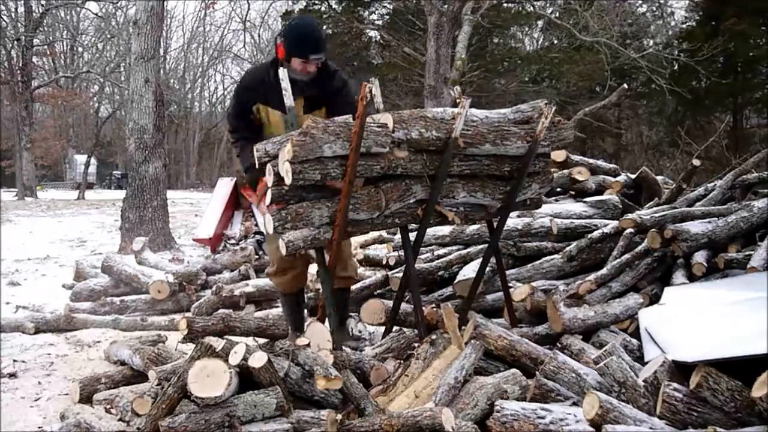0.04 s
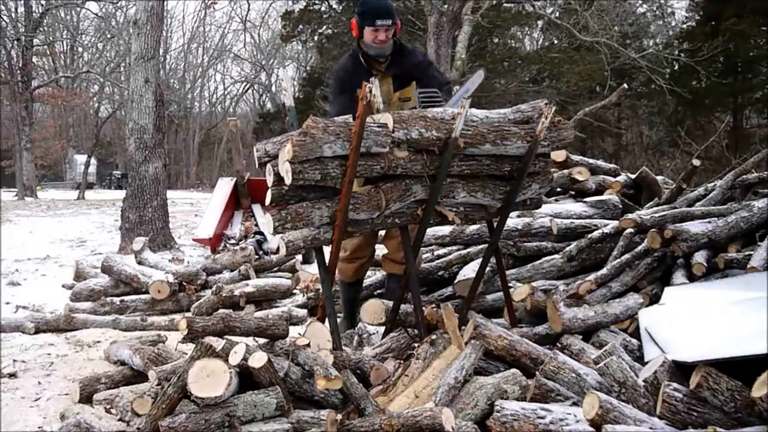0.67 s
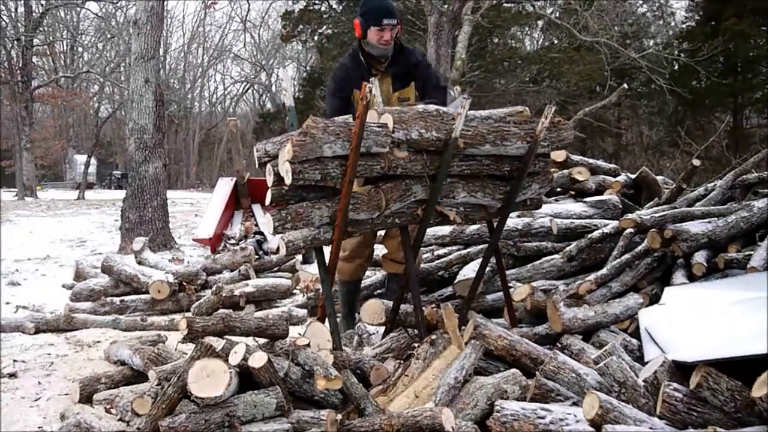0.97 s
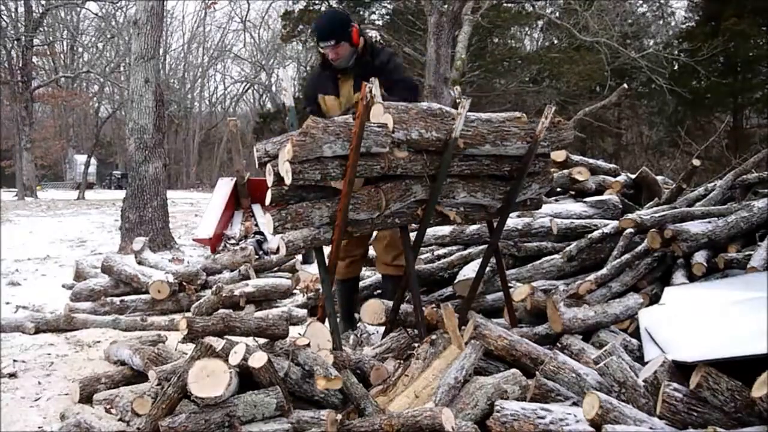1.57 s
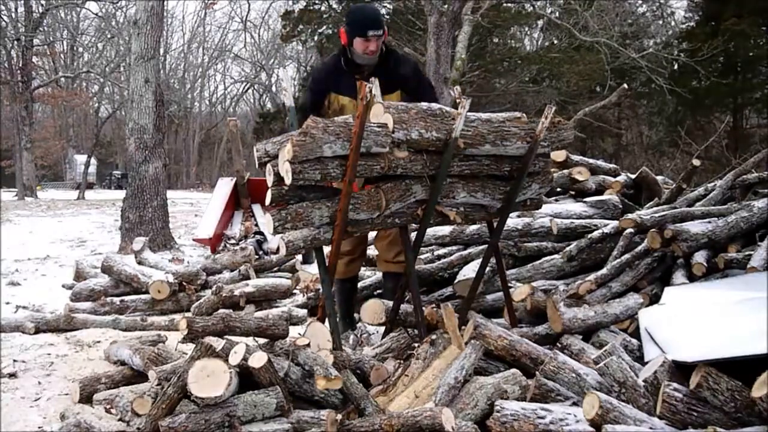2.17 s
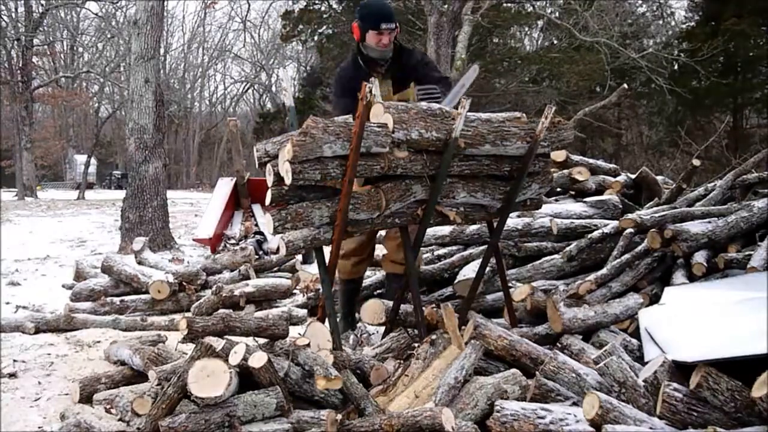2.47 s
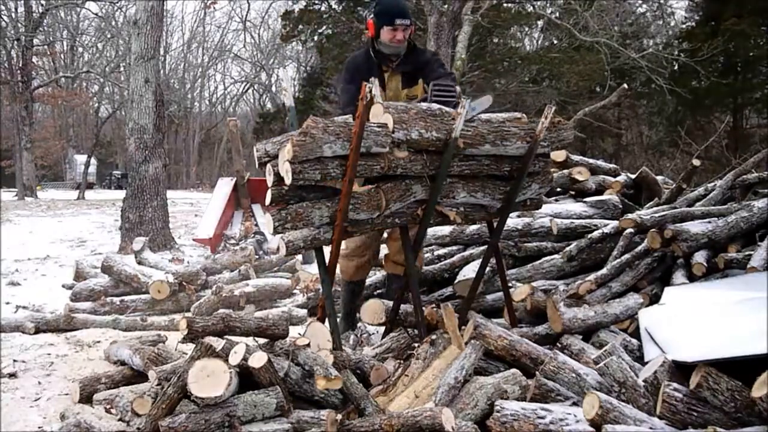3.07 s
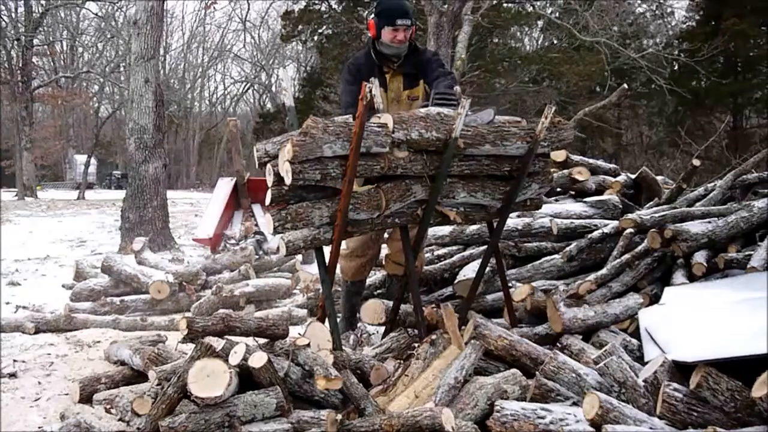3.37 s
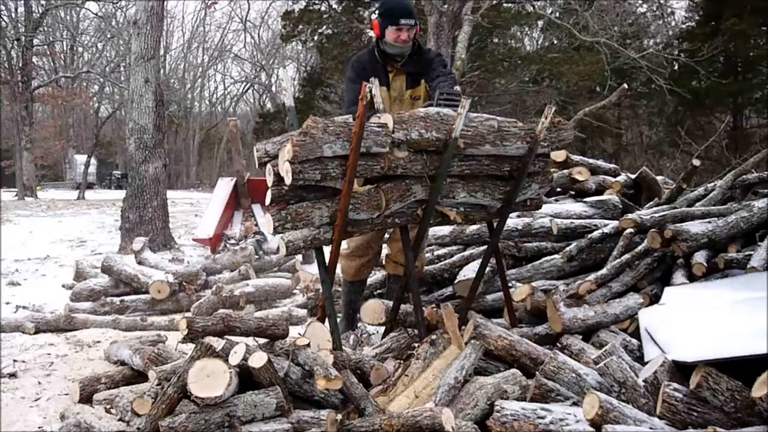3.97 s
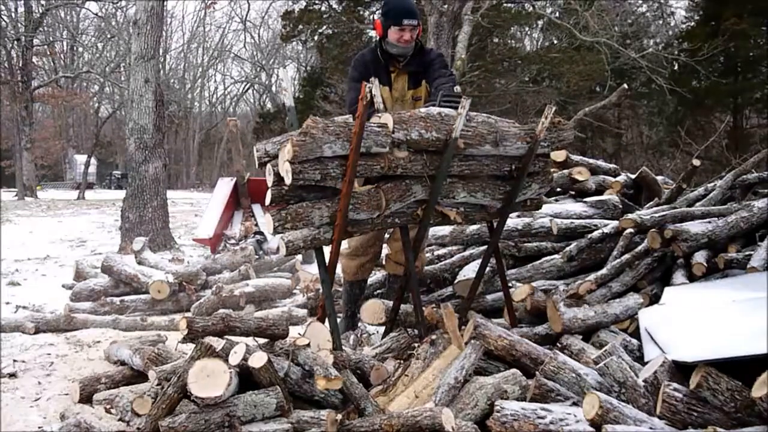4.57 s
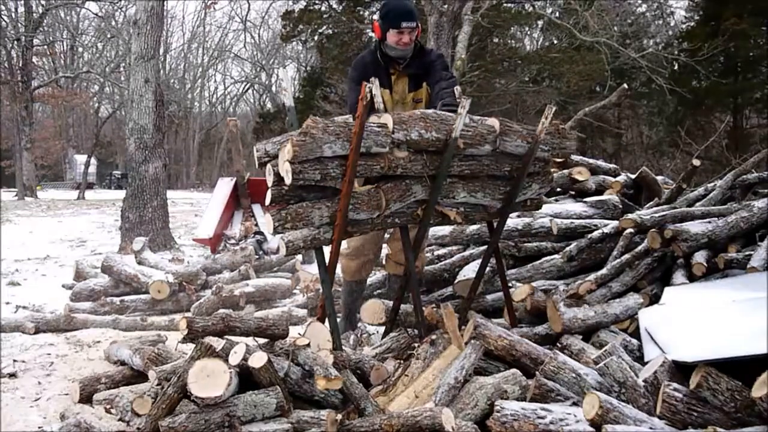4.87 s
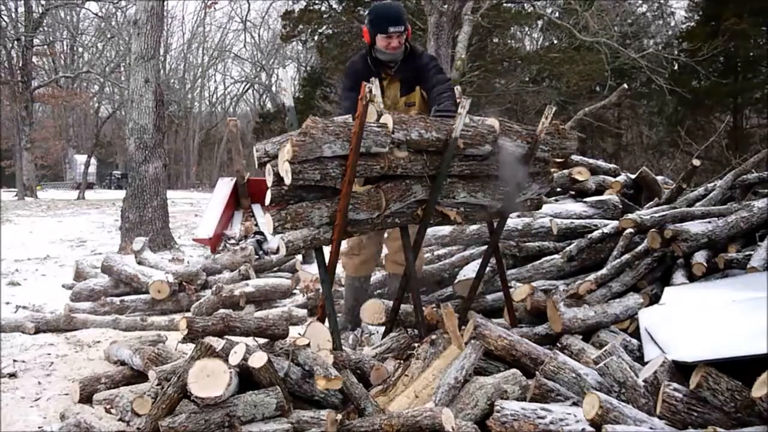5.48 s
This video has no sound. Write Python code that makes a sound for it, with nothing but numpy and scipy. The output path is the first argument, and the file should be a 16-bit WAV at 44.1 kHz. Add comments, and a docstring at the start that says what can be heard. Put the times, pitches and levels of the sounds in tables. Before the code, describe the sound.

A two-stroke chainsaw runs straight ahead in a quiet, echoless yard, high-pitched and hurried as if sped up. It opens with rapid throttle blips over faint wind, then revs to a shrill whine from 0.5 to 0.8 seconds, falls to a puttering idle and stops at about 1.3 with a plastic click. From 1.2 to 2.3 seconds, gusts buffet the microphone with a string of dull thumps. Just before 2 seconds the engine restarts with a sharp click, idles and blips three times. At 2.4 it goes to full throttle and by 2.7 bites into logs, the pitch sagging and wavering under load while the chain hisses and clatters. Around 5 seconds the note dips, then leaps up again and sinks back as the saw keeps running to the end at about 5.6 seconds.

```python
"""A two-stroke chainsaw in a snowy yard, heard in fast motion, so that every pitch is high.
It is blipped, idles and stops, then restarts and bites into logs, its speed sagging under load.
One firing a turn makes a harmonic series, shaped by the exhaust and the muffler's resonances;
the chain clatters and hisses in step with the crank, and the plastic casing clicks.
Gusts buffet the microphone over a faint background of still air."""
import sys
import numpy as np
from scipy import signal
from scipy.fft import rfft, irfft
from scipy.io import wavfile
from scipy.ndimage import uniform_filter1d

SR = 44100
rng = np.random.default_rng(int(sys.argv[2]) if len(sys.argv) > 2 else 0)


def file_out(sig):
    """Save sig as 16-bit WAV at sys.argv[1]."""
    # one column per channel
    cols = np.atleast_2d(sig).T
    # limit, then scale
    lim = np.clip(cols, -1, 1)
    pcm = np.round(lim * 32767).astype(np.int16)
    wavfile.write(sys.argv[1], SR, pcm)


N = 248724
TIME = np.arange(N) / SR
FFT_SIZE = 2 ** 18
BIN_HZ = np.fft.rfftfreq(FFT_SIZE, 1 / SR)
IDLE_HZ = 168.25

# Short blips of the throttle. Each row: start and length in seconds, target firing rate in Hz,
# then relative levels in dB of exhaust, muffler and chain lift.
THROTTLE_BLIPS = [(0.072, .01, 383, -40, -38, 2.5), (0.172, 0.041, 295, -38, -24, 4),
                  (.238, 0.037, 386, -30, -22.5, 5), (0.289, 0.043, 353, -29, -38, 9),
                  (.35, .038, 350, -30, -28, 7.5), (.447, .033, 440, -23, -16.5, 1),
                  (2.214, .038, 359, -20, -17, 6.5), (2.279, .036, 546, -18.5, -20.5, 5),
                  (2.347, .04, 700, -19, -20, 1.5)]


def saw(stop_s=1.25, run_down_s=0.05, restart_s=1.928, catch_s=0.02):
    """Phase locking: one crank times exhaust, muffler and chain, so all share its fundamental."""
    running = np.clip((stop_s + run_down_s - TIME) / run_down_s, 0, 1)
    running += np.clip((TIME - restart_s) / catch_s, 0, 1)
    speed_hz = engine_speed() * (1 + running) / 2
    ragged = np.clip((470 - speed_hz) / 290, 0, 1)  # a slow engine runs unevenly
    acceleration = uniform_filter1d(np.gradient(speed_hz, TIME), size=700)
    surge = np.clip(acceleration / 5500, 0, 1)
    exhaust_db, muffler_db, lift_db = throttle_levels(speed_hz)
    turns = crank_turns(speed_hz, ragged)
    effort = np.clip((exhaust_db + 28) / 5, 0, 1)
    pulses = gas_swirl(firings(turns, np.maximum(ragged, surge ** 2)), effort)
    shut = np.clip((-29 - exhaust_db) / 6, 0, 1)  # a weak exhaust only putters
    note = exhaust(pulses, np.maximum(ragged, shut), exhaust_db + 1.33 * wander(21.5))
    engine = scream(note, speed_hz) + muffler(pulses, turns, ragged, surge, muffler_db + wander(85))
    chain_db = -26 + 5 * np.log2(speed_hz / 599) + 2 * surge + lift_db  # louder when fast or jerked
    return running * (engine + chain(turns, ragged, surge, chain_db))


def engine_speed(first_hz=496.4):
    """Inertia keeps the firing rate continuous: each throttle opening starts from the speed it finds."""
    # Revving in the air, and the run through the cut. Each row: time in seconds, firing rate in Hz.
    free_rev = [(0.48, 500), (0.5, 612.4), (0.54, 765.5), (0.62, 842), (0.732, 823), (0.798, 761.9),
                (0.862, 462.4), (0.93, 470), (1.0, 242)]
    cut = [(2.42, 572), (2.45, 678.2), (2.47, 761), (2.53, 799.5), (2.62, 782), (2.67, 695), (2.78, 636),
           (2.92, 646.3), (2.95, 601.3), (3.05, 664.7), (3.12, 673), (3.22, 617), (3.28, 529.5),
           (3.34, 577), (3.41, 558), (3.55, 637), (3.74, 668.5), (4.04, 604.8), (4.19, 618.7),
           (4.27, 576.5), (4.32, 571.4), (4.34, 628), (4.38, 648), (4.48, 571), (4.74, 544.8), (4.89, 555),
           (4.98, 442.4), (5.05, 442.7), (5.14, 677), (5.2, 751), (5.25, 766), (5.29, 689), (5.44, 632),
           (5.53, 533.6), (5.56, 599), (5.59, 556.1), (5.64, 628)]
    openings = [(s, [(s + length, hz)]) for s, length, hz, *_ in THROTTLE_BLIPS]
    openings += [(run[0][0], run[1:]) for run in (free_rev, cut)]
    speed = coasting(0, first_hz)
    for start, points in sorted(openings):
        driven = curve([(start, np.interp(start, TIME, speed)), *points])
        speed = np.select([TIME < start, TIME < points[-1][0]], [speed, driven], coasting(*points[-1]))
    return uniform_filter1d(speed, size=500)  # the flywheel rounds off every change


def coasting(start, from_hz, decay_s=0.18):
    """With the throttle shut, the speed decays exponentially until it reaches idle."""
    return np.maximum(from_hz * np.exp(-np.maximum(TIME - start, 0) / decay_s), IDLE_HZ)


def throttle_levels(speed_hz):
    """Attack and decay: the throttle lifts exhaust, muffler and chain above their coasting dB levels."""
    # The throttle held wide open or ajar. Each row: start and length in seconds,
    # then relative levels in dB of exhaust, muffler and chain lift.
    pulls = [(0.476, .29, -19.5, -32.5, -1), (0.797, 0.05, -23, -35, -2), (0.858, .075, -28, -20, -1.5),
             (1.946, 0.2494, -31, -48, 3.5), (2.39, 2.65, -22.5, -25, 1),
             (4.914, 0.1535, -23.5, -22.5, 1.5), (5.063, 0.59, -21, -23, 1)]
    # Response of exhaust, muffler and chain in turn. Each row: rise and fall time in seconds.
    response_times = [(0.0125, 0.015), (0.019, 0.0087), (0.0093, 0.27)]
    coast_db = 1.5 * np.log2(speed_hz / IDLE_HZ)  # louder while still spinning fast
    gain = gain_of([-34.5 + coast_db, -41.5 + coast_db, np.zeros(N)])
    for start, length, *_, exhaust_db, muffler_db, lift_db in THROTTLE_BLIPS + pulls:
        opening = np.array([swell(start, length, rise, fall) for rise, fall in response_times])
        gain = np.maximum(gain, gain_of([[exhaust_db], [muffler_db], [lift_db]]) * opening)
    return 20 * np.log10(gain)


def crank_turns(speed_hz, ragged, waver=0.0016, stumble=0.02989, hunt=0.05):
    """Phase is the integral of frequency; near idle the speed stumbles and hunts at random."""
    idling = ragged ** 6
    jitter = (waver + stumble * idling) * wander(132.3)
    drift = hunt * idling * wander(17.87)
    return np.cumsum(speed_hz * (1 + jitter + drift)) / SR


def firings(turns, ragged, spread_db=2.0):
    """An impulse train, one pulse a turn, gives a harmonic series; uneven burning varies the pulses."""
    chance = rng.standard_normal(N)
    at = np.flatnonzero(np.diff(np.floor(turns)) > 0)
    exact = at + (np.ceil(turns[at]) - turns[at]) / (turns[at + 1] - turns[at])
    size = gain_of(spread_db * ragged[at] * np.minimum(chance[:len(at)], 1))
    near = np.clip(at[:, None] + np.arange(-8, 9), 0, N - 1)
    lag = near - exact[:, None]
    pulses = size[:, None] * np.sinc(lag) * np.sinc(lag / 9)  # band-limited, centred between samples
    return np.bincount(near.ravel(), pulses.ravel(), N)


def gas_swirl(pulses, share, smear_s=0.001215):
    """Dispersion: running hard, the gas leaves in a drawn-out swirl whose low tones lag the high ones."""
    group_delay = smear_s * np.exp(-BIN_HZ / 4000)
    phase = 2 * np.pi * np.cumsum(group_delay) * BIN_HZ[1]
    swirl = irfft(rfft(pulses, FFT_SIZE) * np.exp(-1j * phase))[:N]
    return np.sqrt(share) * swirl + np.sqrt(1 - share) * pulses


def exhaust(pulses, weak, level_db):
    """Source and filter: the exhaust port shapes firings into a full note, or a thin putter when weak."""
    # Exhaust spectra, throttle open and shut. Each row: frequency in Hz, relative gain in dB.
    open_spectrum = [(200, -60), (430, 10), (660, 0), (800, -5), (930, -2), (1120, 6.5), (1250, -1.5),
                     (1600, 11), (1950, 0.5), (2500, -2), (3200, 3.5), (4200, -5), (5100, -7), (8000, -42)]
    shut_spectrum = [(25, -60), (100, -30), (300, -1.5), (700, -5.5), (1100, 2), (1700, 6.5), (2400, 2.5),
                     (3200, -5), (4400, -7), (5500, -26), (9000, -61)]
    full = steadied(coloured(pulses, open_spectrum))
    putter = steadied(coloured(pulses, shut_spectrum))
    thin = np.clip(2 * weak, 0, 1)
    return gain_of(level_db - 2.5 + thin) * steadied((1 - thin) * full + thin * putter)


def scream(note, speed_hz, from_hz=774):
    """Spectral emphasis: near top speed the upper harmonics grow and the exhaust note hardens."""
    # The band that rises. Each row: frequency in Hz, relative gain in dB.
    band = [(2000, -38), (3200, -15.5), (4500, 9), (5300, -17), (8000, -20)]
    rise_db = 0.08 * np.maximum(speed_hz - from_hz, 0)
    return note + (gain_of(rise_db) - 1) * coloured(note, band)


def muffler(pulses, turns, ragged, surge, level_db):
    """Forced resonance: the can rings as harmonics cross its modes; slow or surging firings just bark."""
    # Modes of the can. Each row: frequency in Hz, bandwidth in Hz, relative gain in dB.
    modes = [(2400, 470, 0.5), (2608, 41, 11)]
    puffs = steadied(np.exp(-(turns % 1) / 1.6) * rng.standard_normal(N))
    drive = steadied(pulses) + (0.032 + 0.19 * ragged + 0.31 * surge) * puffs
    ring = sum(gain_of(db) * signal.lfilter(*signal.iirpeak(hz, hz / width, SR), drive)
               for hz, width, db in modes)
    bark = np.clip(2 * ragged + surge, 0, 1)
    band = [(700, -15), (1500, -46), (2050, 8.5), (2700, 5), (3300, -6.5), (4200, -11), (7000, -34)]
    return gain_of(level_db - 4.5) * evened(coloured((1 - bark) * ring + bark * drive, band))


def chain(turns, ragged, surge, level_db):
    """Tones and noise add in power: chips, jerks and slow running shift the chain's clatter to hiss."""
    # The chain's bite in the wood. Each row: time in seconds, depth from 0 to 1.
    bite_depths = [(0, 0.5), (2.6, 0), (2.75, 0.96), (4.9, 1), (5.0, 1), (5.22, 0.58), (5.35, 0.46)]
    bite = curve(bite_depths)
    hiss = chain_hiss(turns, ragged, bite) * treble_dropout()
    tonal = (0.62 - 0.07 * bite) * (1 - ragged) ** 3 * (1 - 0.7 * surge)
    return gain_of(level_db) * (np.sqrt(1 - tonal) * hiss + np.sqrt(tonal) * clatter(turns, bite))


def clatter(turns, bite):
    """Periodic impacts: cutters slap the bar at crank harmonics, which the slack chain keeps shifting."""
    # Cutter harmonics. Each row: multiple of the engine speed, relative dB running free and in wood.
    harmonics = [(6, 11, 5), (7, 5, -2.5), (8, 8.5, -9.5), (9, 4.5, -20), (10, 4.5, -26), (11, -2, -7),
                 (12, 1, -7), (13, 0, -24.5), (14, 6.5, -10), (15, -1.5, -10.5), (16, 4.5, -7.5),
                 (17, -19, -13), (18, 2, -6), (19, -22, -16.5), (20, 6, -16), (21, -20, -9.5),
                 (22, -28, -43), (23, -5, -54), (24, -9, -30), (25, -7, -37), (26, -40, -15)]
    slap_turns = turns + (0.002 + 0.0015 * bite) * wander(70)
    tones = 0
    for multiple, free_db, cutting_db in harmonics:
        phasor = np.exp(2j * np.pi * rng.random()) + 0.65 * (wander(13) + 1j * wander(13))
        db = free_db + bite * (cutting_db - free_db)
        tones += gain_of(db) * (phasor * np.exp(2j * np.pi * multiple * slap_turns)).real
    return steadied(coloured(tones, [(2500, -10), (4500, -5), (5200, 0), (15500, 1), (17000, -20)]))


def chain_hiss(turns, ragged, bite, flutter_db=2.5):
    """Amplitude modulation: the noise of the moving chain swells once a turn, more deeply at idle."""
    # The rush of chain, chips and cooling air, and the jingle of the loose chain.
    # Each row: frequency in Hz, relative spectral density in dB.
    rush_spectrum = [(40, -54), (130, -26), (400, -20), (850, -34), (1300, -6), (2500, -3), (4000, 1.5),
                     (6000, 2), (8000, 2), (10500, 2), (12500, 1), (14500, 7.5), (16000, -3.5)]
    jingle_spectrum = [(40, -53), (200, -21), (1000, -7.5), (2500, 8), (4200, 0), (5500, -2.5), (9000, -4),
                       (9700, 0.5), (11200, -1.5), (12200, 0), (14000, -9), (16000, 4)]
    throb = evened(np.exp((0.077 + 0.24 * ragged) * np.cos(2 * np.pi * (turns - 0.75))))
    rush = steadied(throb * noise(rush_spectrum))
    jingle = steadied(throb * noise(jingle_spectrum))
    slack = np.clip(2 * ragged + 0.5 * (1 - bite), 0, 1)  # out of the wood the chain hangs loose
    return gain_of(flutter_db * wander(91)) * (np.sqrt(1 - slack) * rush + np.sqrt(slack) * jingle)


def treble_dropout(at_s=4.398, width_s=0.02, depth_db=-23):
    return gain_of(depth_db * np.exp(-((TIME - at_s) / width_s) ** 2))


def casing_clicks():
    """Damped vibration: switch, starter and handle set off brief rattles of the plastic casing."""
    # Each row: start in seconds, level in dB, time to decay by 60 dB in seconds.
    clicks = [(.071, -27, .02), (1.278, -19.5, .03), (1.394, -46, .04), (1.595, -36, .04),
              (1.945, -12.5, .02), (2.156, -28, .03)]
    # The casing's response. Each row: frequency in Hz, relative spectral density in dB.
    spectrum = [(500, -3), (1800, 0.5), (2700, 1), (3400, 5.5), (4500, -6), (6500, 2), (10000, -11),
                (16000, -3)]
    level = sum((TIME >= s) * gain_of(db - 60 * abs(TIME - s) / t60) for s, db, t60 in clicks)
    return level * evened(noise(spectrum))


def wind(rise_s=0.0094, lumpy_db=4.0):
    """Turbulence: the eddies of each gust strike the microphone as dull lumps of pressure."""
    # Each row: start in seconds, length in seconds, level in dB, fade time in seconds.
    gusts = [(0, 0.38, -40.5, 0.12), (1.17, 0.28, -31, 0.0061), (1.458, 0.098, -42, 0.12),
             (1.72, 0.031, -28.5, 0.0054), (1.775, 0.13, -27, 0.0067), (1.975, 0.066, -31.5, 0.011),
             (2.077, 0.12, -26, 0.0081), (2.22, 0.12, -34.5, 0.39)]
    # The buffeting. Each row: frequency in Hz, relative spectral density in dB.
    spectrum = [(30, -56), (60, -38), (135, -15), (240, -7), (390, -3), (740, -2), (1150, -6), (1660, -16),
                (2200, -20.5), (2600, -26.5), (3500, -37), (5000, -80)]
    level = sum(gain_of(db) * swell(s, length, rise_s, fade) for s, length, db, fade in gusts)
    eddies = steadied(noise(spectrum), size=200)
    return level * evened(eddies * gain_of(lumpy_db * wander(140)))


def thumps():
    """Impulse response: single pressure pulses on the microphone, dull for lack of treble."""
    # Each row: time in seconds, peak level in dB.
    pressure_peaks = [(1.157, -13.5), (1.195, -12), (1.231, -10.5), (1.336, -18), (1.438, -13.5),
                      (1.571, -19.5), (1.715, -12), (1.753, -14.5), (1.815, -13), (1.896, -6),
                      (1.989, -7.5), (4.01, -26), (4.271, -25), (5.008, -25)]
    # The colour of a thump. Each row: frequency in Hz, relative gain in dB.
    spectrum = [(25, -45), (60, -16), (250, -4), (700, 4), (1300, -2), (1800, -7.5), (2600, -28),
                (4000, -67)]
    blows = np.zeros(N)
    for s, db in pressure_peaks:
        blows[round(s * SR)] = gain_of(db)
    dull = coloured(blows, spectrum)
    return dull * blows.max() / dull.max()


def still_air(level_db=-52):
    """Ambient noise: the yard's faint, steady broadband floor."""
    # Each row: frequency in Hz, relative spectral density in dB.
    spectrum = [(30, -35), (100, -3), (450, -0.5), (1300, -2), (5000, -4), (15500, -13)]
    return gain_of(level_db) * evened(noise(spectrum))


def gain_of(db):
    """Decibels to amplitude."""
    return 10 ** (np.asarray(db) / 20)


def evened(x):
    """Normalises to an rms of 1."""
    return x / np.sqrt(np.mean(x ** 2) + 1e-20)


def steadied(x, size=1100):
    """Holds the running rms near 1, leaving single pulses their own sizes."""
    return x / np.sqrt(uniform_filter1d(uniform_filter1d(x ** 2, size), size) + 1e-12)


def curve(points):
    """Linear interpolation over time between (seconds, value) points."""
    return np.interp(TIME, *np.transpose(points))


def swell(start, length, attack, release):
    """An envelope that rises, holds and decays exponentially."""
    return np.clip((TIME - start) / attack, 0, 1) * np.exp(-np.maximum(TIME - start - length, 0) / release)


def coloured(x, points):
    """Zero-phase filtering by a spectrum of (Hz, dB) points."""
    hz, db = np.transpose(points)
    response = gain_of(np.interp(np.log(BIN_HZ + 1), np.log(hz), db))
    return irfft(rfft(x, FFT_SIZE) * response)[:N]


def noise(spectrum):
    """White noise filtered to a spectrum."""
    return coloured(rng.standard_normal(N), spectrum)


def wander(rate_hz):
    """Smooth random modulation of rms 1, with a bandwidth of about rate_hz."""
    white = rng.standard_normal(len(BIN_HZ)) + 1j * rng.standard_normal(len(BIN_HZ))
    return evened(irfft(white * np.exp(-(BIN_HZ / rate_hz) ** 2))[:N])


def scene():
    """Superposition in a free field: snow gives no echo, and the saw ahead is alike in both ears."""
    return np.tile(saw() + wind() + thumps() + casing_clicks() + still_air(), (2, 1))


def record(dry, ceiling=0.47, cutoff_hz=15850):
    """Soft saturation rounds the loudest peaks; a low-pass filter then limits the band."""
    rounded = dry / (1 + (dry / ceiling) ** 6) ** (1 / 6)
    low_pass = signal.firwin(511, cutoff_hz, window=("kaiser", 9), fs=SR)
    return signal.oaconvolve(rounded, low_pass[None], "same")


dry = scene()
out = record(dry)
file_out(out)
```